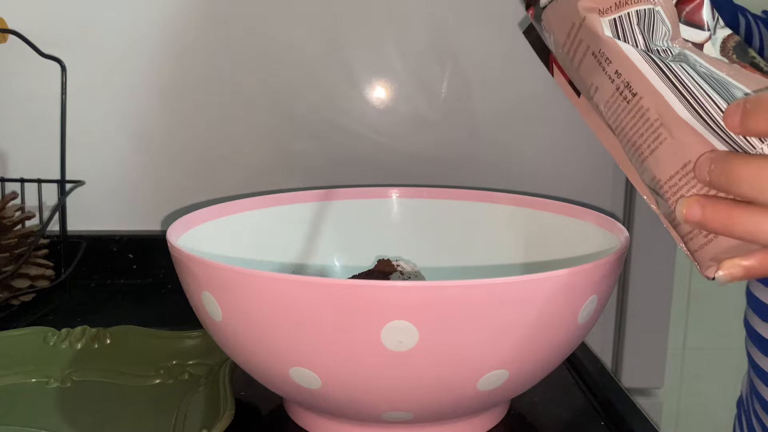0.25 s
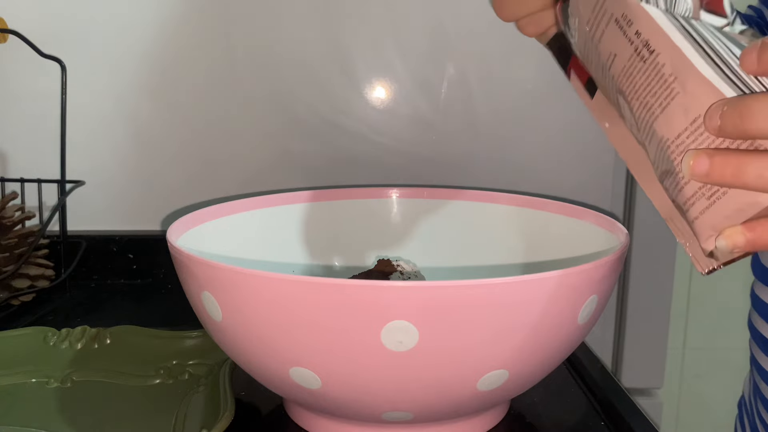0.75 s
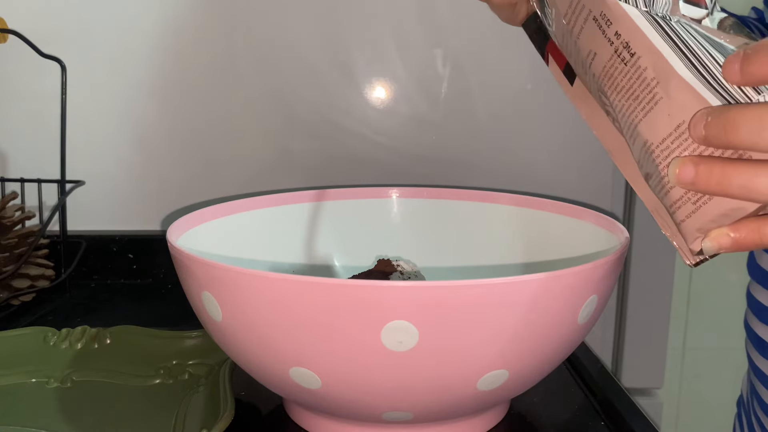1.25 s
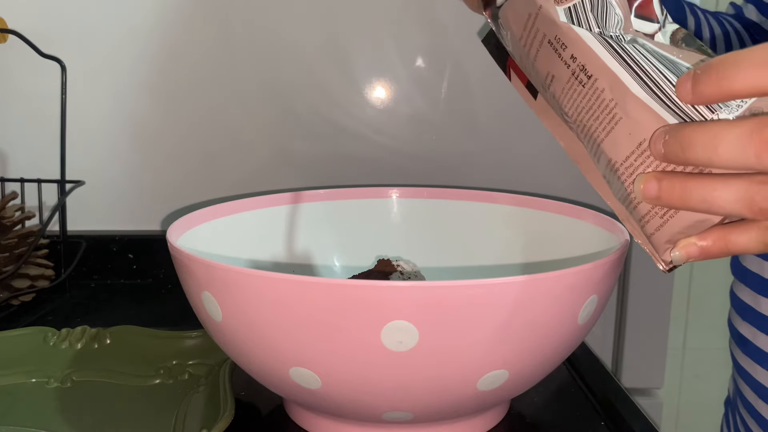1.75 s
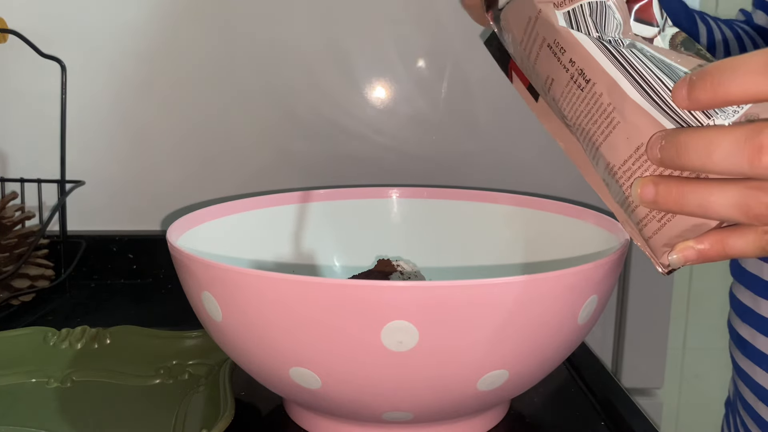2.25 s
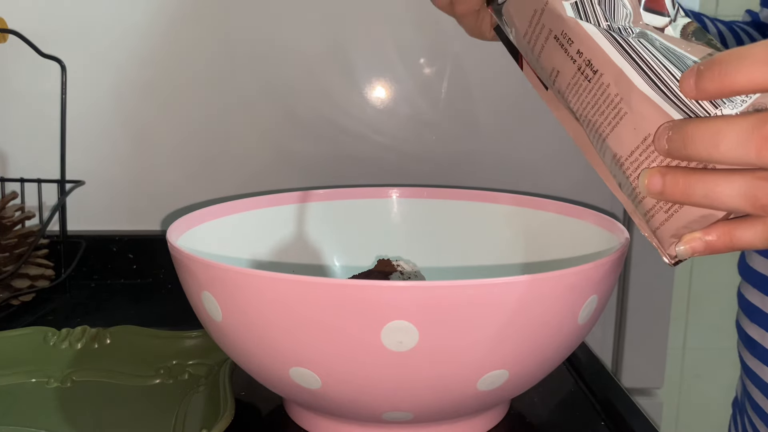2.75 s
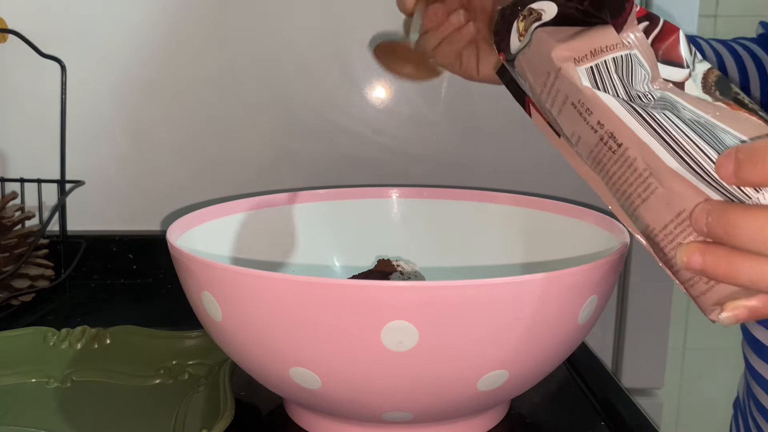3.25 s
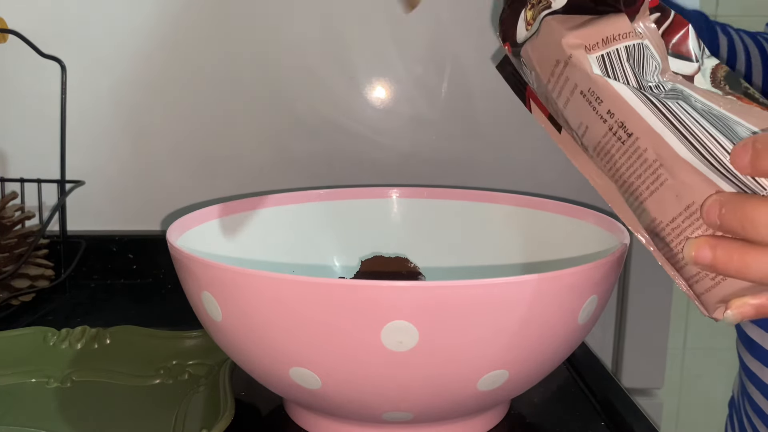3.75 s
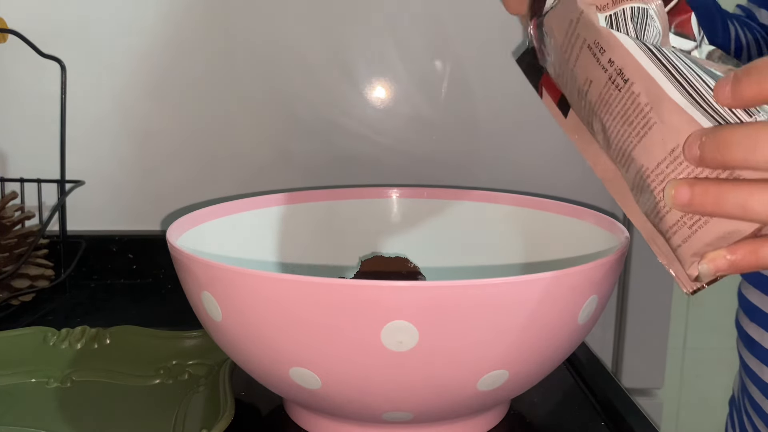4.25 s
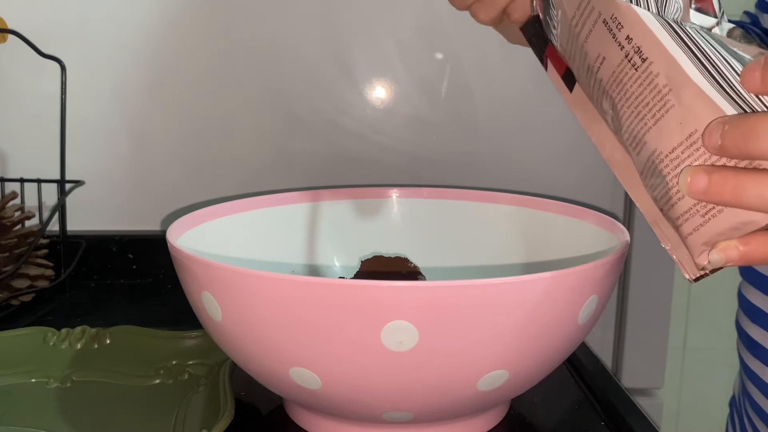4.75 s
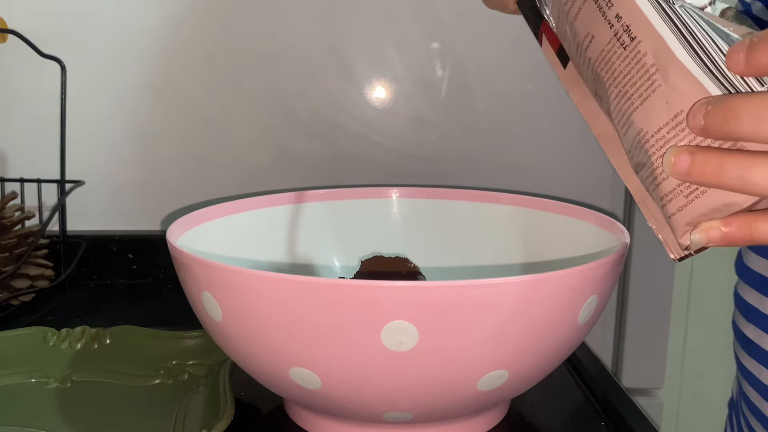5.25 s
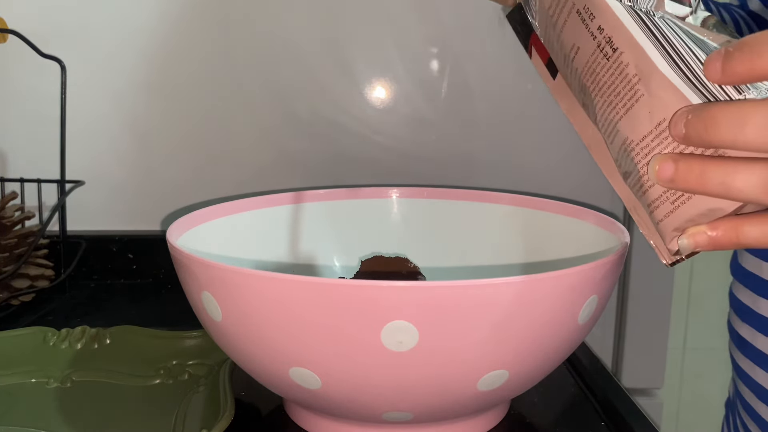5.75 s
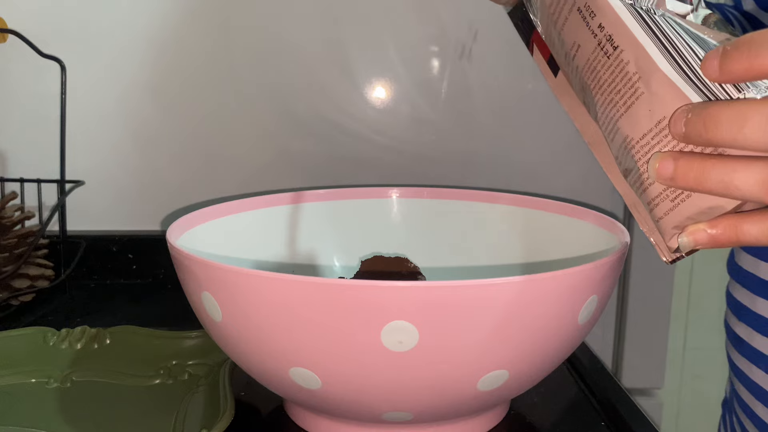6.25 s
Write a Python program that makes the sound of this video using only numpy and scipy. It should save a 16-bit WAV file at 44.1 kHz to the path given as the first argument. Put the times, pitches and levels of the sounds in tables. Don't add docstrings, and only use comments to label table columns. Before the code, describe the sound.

In a quiet kitchen, a spoon digs in a paper and foil packet close to a stereo microphone. Dry rustling and irregular crackles build to sharp snaps, then the packet rests while soft low thuds come through the worktop. A second dig brings louder cracks, lighter crinkling, a tiny pause and bright final snaps. A vehicle drones low outside at first, sinking in pitch and fading.

```python
import sys
import numpy as np
from scipy import signal
from scipy.fft import rfft, irfft, next_fast_len
from scipy.io import wavfile

SR = 44100
rng = np.random.default_rng(int(sys.argv[2]) if len(sys.argv) > 2 else 0)


def level_to_linear(level):
    exponent = np.asarray(level, float) / 20
    return 10 ** exponent


def materialize(psi):
    bounded = np.clip(np.atleast_2d(psi).T, -1, 1)
    quanta = np.round(bounded * 32767).astype(np.int16)
    wavfile.write(sys.argv[1], SR, quanta)


N = 285768
SIZE = next_fast_len(N + SR)
HZ = np.maximum(np.arange(SIZE // 2 + 1) * SR / SIZE, 1)

# frequency [Hz], density [dB per Hz].
AIR_COLOUR = [(120, -15), (190, -10), (310, -3.5), (430, -11), (700, -32), (1100, -19), (2100, -50.5),
              (4000, -42.5), (7000, -47), (9500, -40.5), (12000, -48), (13000, -58.5), (16000, -74.5)]
# frequency [Hz], level [dB].
FRIDGE_HUM = [(296, -65.5), (345, -72.5)]
# time [s], level [dB].
TYRE_WASH = [
    (0, -59),
    (1.5, -61),
    (3.0, -60.5),
    (3.3, -63),
    (3.6, -66.5),
    (4.0, -68),
    (6.48, -64.5),
]
# frequency [Hz], density [dB per Hz].
TYRE_COLOUR = [(250, 0), (500, 2.5), (1000, -4), (1800, -11.5), (2400, -18.5), (5000, -27), (9000, -45)]
# time [s], firing pitch [Hz], engine level [dB], road rumble level [dB].
VEHICLE = [(0, 50.9, -48, -47), (.25, 49.76, -46, -39), (.6, 48.58, -45.5, -43),
           (1.13, 45.62, -39.5, -36.5), (1.55, 42.64, -47.5, -44), (1.85, 40.95, -60, -48.5),
           (2.5, 41.03, -52.5, -49), (3.1, 40.3, -50, -46), (3.4, 40.3, -86.5, -46), (4.1, 40.1, -97, -51),
           (4.6, 40.6, -99, -60), (6.48, 41.5, -106, -60.5)]
# peak time [s], fall [s], strength [dB], wood ring over strength [dB].
WORKTOP_THUDS = [(.16, 0.067, -42.5, -18), (3.188, 0.13, -32.5, 0), (3.249, 0.19, -34.5, -16),
                 (3.649, 0.12, -38, -9.5), (3.748, 0.14, -43, -4), (3.859, 0.17, -39.5, -32.5),
                 (4.071, 0.076, -45.5, -1), (4.222, 0.063, -51, 9), (4.245, 0.13, -39, -9),
                 (4.79, 0.19, -46, -7.5), (.98, 0.052, -46, 1.5), (2.94, 0.21, -45.5, -17),
                 (5.63, 0.023, -52, -12.5)]
# frequency [Hz], width [Hz], level [dB].
WORKTOP_MODES = [(254, 34, -3.5), (316.8, 32, 5), (402, 50.5, 1.5), (440.6, 23.5, 3), (708, 68, -18),
                 (1150, 270, -28.5)]
# peak time [s], rise [s], fall [s], paper [dB], foil over paper [dB].
FIRST_SQUEEZES = [(0.137, 0.00506, 0.039, -42, -8.5), (.156, .01, 0.071, -53, -8),
                  (.195, 0.015, 0.13, -54.5, 4), (0.23, 0.067, .06, -54.5, 1),
                  (0.264, 0.097, 0.0136, -56.5, -6), (0.303, 0.0044, 0.084, -48, -12),
                  (0.337, 0.028, .11, -44.5, -5), (0.441, 0.0044, 0.014, -49.5, -22),
                  (.458, .003, 0.02, -42, -20), (0.475, 0.053, 0.036, -47, -6.5),
                  (0.629, 0.092, 0.14, -54.5, -8.5), (0.725, 0.14, 0.13, -45.5, -8),
                  (.79, 0.096, .04, -57, -8), (.92, 0.057, 0.055, -55, -14), (0.962, 0.6, 0.069, -59, -3.5),
                  (1.08, 0.029, 0.12, -75, 13.5), (1.185, 0.12, 0.18, -60, 7.5),
                  (1.334, 0.056, 0.1, -58.5, 8.5), (1.379, 0.017, 0.053, -48.5, -8),
                  (1.494, 0.14, 0.06, -58.5, -1.5), (1.572, 0.041, 0.13, -65.5, 5.5),
                  (1.647, 0.048, 0.096, -62, 6), (1.899, 0.058, 0.062, -59.5, 7),
                  (1.73, 0.1, 0.074, -60.5, 7), (1.813, .02, 0.12, -54, 0), (1.848, 0.094, 0.063, -58, 9.5),
                  (2.004, 0.0061, 0.15, -48, 0), (2.18, 0.017, 0.1, -50, 0),
                  (2.24, 0.024, 0.045, -51.5, -0.5), (2.333, 0.011, 0.12, -47, -3.5),
                  (2.378, 0.022, 0.19, -44.5, -15), (2.517, 0.088, 0.076, -45.5, -7.5),
                  (2.652, 0.11, 0.11, -58.5, -7), (2.777, 0.09, 0.16, -49, -5.5),
                  (2.971, 0.062, 0.05, -42.5, -6), (3.065, 0.035, 0.062, -67, -26)]
SECOND_SQUEEZES = [(4.031, 0.15, 0.027, -59, 5), (4.066, 0.006, 0.042, -44.5, -8),
                   (4.14, .07, 0.036, -67.5, 5), (4.222, 0.017, 0.12, -45, -13),
                   (4.352, 0.11, 0.15, -52, -8), (4.436, 0.078, 0.049, -52, -11),
                   (4.461, 0.032, 0.054, -38, -6.5), (4.55, 0.88, 0.354, -61.5, -5.5),
                   (4.752, 0.114, 0.017, -55.5, -2.5), (4.775, 0.03, 0.17, -51.5, -26),
                   (4.81, .016, 0.033, -55, 6.5), (4.935, 0.042, 0.18, -57, -2.5),
                   (5.011, 0.0066, 0.051, -55.5, -5), (5.114, 0.2, 0.18, -54.5, 1.5),
                   (5.27, 0.86, 0.17, -69, 0.5), (5.449, 0.12, 0.023, -70, 4.5),
                   (5.501, 0.037, 0.073, -63, 4), (5.547, 0.073, 0.015, -65.5, 3),
                   (5.619, 0.024, 0.081, -53.5, 4), (5.698, 0.065, 0.027, -56, 3),
                   (5.829, 0.038, 0.11, -57, 0), (5.901, 0.053, 0.093, -65.5, -2.5),
                   (5.97, 0.033, 0.29, -59, 4.5), (6.129, 0.019, 0.063, -48, 0.5),
                   (6.16, 0.04, 0.12, -49.5, -9), (6.218, 0.076, 0.019, -60.5, 6),
                   (6.294, 0.019, .07, -51, 0), (6.324, 0.033, 0.019, -48, -2),
                   (6.364, 0.073, 0.12, -47, -15), (6.469, 0.068, 0.24, -49.5, -3.5)]
# time [s], level over paper [dB].
BAG_FREEDOM = [
    (0, -11),
    (.5, -13.5),
    (.7, -3),
    (1.4, -5.5),
    (2.4, -16),
    (4.0, -8.5),
    (4.8, -4.5),
    (5.1, -16),
    (5.7, -9),
    (6.48, -21),
]
# from [s], to [s].
RESTS = [
    (3.081, 4.005),
    (5.345, 5.415),
]
# frequency [Hz], density [dB per Hz].
PAPER_COLOUR = [(500, -74.5), (900, 8), (1300, 0.5), (2000, 3.5), (2550, -6), (3300, 2), (4500, -8.5),
                (6000, -10.5), (9000, -18)]
FOIL_COLOUR = [(2500, -22), (4500, -5), (7000, -4.5), (8300, -1.5), (9500, 5), (12500, 0.5), (14000, -3.5),
               (15700, -13.5), (16000, -41)]
BAG_COLOUR = [(150, -5.5), (300, 17.5), (450, 7), (700, 17), (900, -9.5), (1300, -51.5)]
# frequency [Hz], level [dB], t60 [s].
PANEL_MODES = [(960, -4, .02), (1230, -3, .03), (1500, -4, .02), (1760, -4, .02), (1990, -5, .018),
               (3300, -9, .015), (3900, -10, .012)]
BODY_MODES = [(238, -11, 0.061), (364, -6, 0.053), (445, -4.5, 0.054), (545, -11, 0.035),
              (662, -2.5, 0.068), (735, -10, 0.022)]
# time [s], peak [dB],
# panel pitch [Hz], foil brightness [dB], body thump [dB].
FIRST_SNAPS = [(0.1348, -29.5, 1280, -30, -1), (0.3191, -25.5, 1630, -28, -7), (0.3375, -26, 1730, -6, -5),
               (0.457, -28, 3240, -15, -22), (0.6171, -41, 1460, -22, 4), (0.622, -42, 1210, -25, 13.5),
               (0.667, -32.5, 1050, -19.5, -5), (0.7056, -31, 2350, -15, -7), (0.7322, -31.5, 3350, -4, 0),
               (0.7125, -31.5, 1880, -15, -1), (0.7443, -28, 1400, -11, -4), (0.9745, -39.5, 900, -8, 9),
               (1.2717, -31.5, 1284, -32, 3.5), (1.271, -31, 1850, -38, -32),
               (1.3765, -33.5, 1820, 1.5, -20), (1.49, -39.5, 1220, -38.5, -4),
               (2.005, -52.5, 1150, 13.5, 8), (2.1788, -37.5, 1328, -3, -1.5),
               (2.2328, -36, 1230, -18.5, -10.5), (2.3554, -22, 1816, -1.5, -31),
               (2.3813, -18.5, 2140, 3.5, -31.5), (2.4325, -23, 1219, -9, -22.5),
               (2.484, -28, 3440, -2, -17), (2.5087, -18, 2040, -1, -19), (2.7744, -27.5, 1950, -2, -12.5),
               (2.8521, -31, 1845, -15.5, -12.5), (2.9684, -29.5, 1565, -6, -6)]
SECOND_SNAPS = [(4.0628, -33, 1720, -20, -4), (4.074, -35, 1840, -6.5, -7),
                (4.209, -21.5, 1900, -8.5, -11.5), (4.232, -14.5, 2080, -10.5, -12.5),
                (4.2334, -20, 3300, -19, -17), (4.3467, -23.5, 1940, -5.5, -11.5),
                (4.3645, -34, 1930, -26.5, -11), (4.449, -35, 1270, -24, -8),
                (4.4613, -25.5, 3460, -24, -6), (4.622, -50, 1800, -24, -4.5), (4.7414, -50, 1390, 8, -8),
                (4.7555, -15.5, 1690, -15.5, -11.5), (4.7678, -32, 1330, -6, 4.5),
                (4.783, -18, 1250, -40, -12), (4.809, -32.5, 1830, 0, -5), (4.823, -55, 1500, 8, -12),
                (4.9418, -45.5, 1720, -3, -3), (5.008, -41, 1780, 2.5, -3), (5.1112, -38, 3600, -21, -19),
                (5.6116, -44, 1010, -3, 7.5), (5.8253, -46.5, 1200, -5, -11),
                (5.965, -40.5, 1970, 8.5, -0.5), (6.1248, -43.5, 2040, 3, 0), (6.1521, -19.5, 2030, 2, -26),
                (6.2925, -55.5, 1480, 9, 10.5), (6.3193, -19, 2050, 5, -50), (6.3541, -12, 3300, 2, -23)]
FIRST_TICKS = [(0.154, -24, 1250, -4, -25), (0.184, -35, 1760, -10, -25), (0.2032, -26, 1840, -20, -25),
               (0.2445, -28, 1770, -19.5, -25), (0.302, -37, 1480, -12, -25), (0.355, -29, 1220, -14, -25),
               (0.4407, -26, 2260, -12, -25), (0.476, -37, 1270, 2, -25), (0.5915, -35, 1280, -17, -25),
               (0.7097, -21, 1850, -14, -25), (0.7748, -37.5, 1800, -8.5, -25),
               (0.7894, -37, 1670, -11.5, -25), (0.8949, -49, 1718, -13.5, -25),
               (0.9199, -40, 3570, -25, -25), (0.9326, -31, 1620, -18, -25), (0.941, -28, 1770, -5, -25),
               (1.0063, -37, 1950, -10, -25), (1.1802, -51, 1230, -10, -25), (1.3229, -37, 3350, -10, -25),
               (1.6307, -47, 1141, -10, -25), (1.7145, -54, 1670, -10, -25), (1.785, -45, 1938, -10, -25),
               (1.805, -34, 2010, -8, -25), (1.9474, -34.5, 1900, -24, -21), (2.2883, -49, 897, -24.5, -20),
               (2.632, -44, 1880, -10, -25), (2.7015, -46, 1910, -8, -25), (2.7482, -43, 1696, -8, -25),
               (2.8655, -30, 2040, -5, -25), (2.9213, -37, 1930, -15, -25), (2.95, -39, 1630, -12.5, -25),
               (3.039, -29, 1750, -39, -18), (3.0664, -46.5, 1693, -15, -28), (3.1461, -38, 1270, -30, -24)]
SECOND_TICKS = [(4.015, -59, 1000, -10, -25), (4.0292, -42, 1645, -10, -25),
                (4.2414, -40.5, 1500, -11, -25), (4.4287, -27, 3670, -20, -27),
                (4.4669, -12, 1340, -20, -30), (4.548, -50, 1810, -16, -25), (4.71, -39, 1750, -12, -21),
                (4.7943, -19.5, 1180, -28, -21), (4.8928, -41, 1840, -3, -25), (4.9207, -37, 977, -14, -22),
                (4.9791, -40, 1330, -9, -25), (5.0719, -38, 1700, -27, -27), (5.128, -32, 1180, -10, -25),
                (5.1494, -43, 1248, -10, -23), (5.311, -41, 1150, -22, -26.5),
                (5.4879, -52, 1030, -10, -30), (5.53, -43, 1030, -15, -25), (5.6734, -50, 4100, -17, -25),
                (5.6806, -38, 4030, -10, -25), (5.7533, -41, 1740, -8, -25), (5.9069, -43, 1300, -10, -25),
                (6.2877, -42, 1830, -7.5, -25), (6.4644, -40, 2020, -14, -27)]
# frequency [Hz], lead of the left channel [radians].
CHANNEL_PHASE = [(0, 0), (340, -.7), (800, 2.3), (1750, -.6), (2900, 1.5), (4100, 0.1), (5400, 2.2), (7200, 0),
                 (8600, -2.85), (9400, -3.4), (11000, -6.28), (12750, -9.2), (14000, -9.7), (14800, -12.56)]
# frequency [Hz], share [0 to 1].
CHANNEL_SPREAD = [(60, .04), (250, .3), (600, .85), (1500, .6), (5500, .8), (7000, .12), (9000, .01),
                  (16000, .01)]
# frequency [Hz], left minus right [dB].
CHANNEL_BALANCE = [(60, -3.5), (110, 0), (200, -3.5), (380, -1), (700, 0), (1290, 0), (2380, 1.5), (4400, 1.5),
                   (8120, 4.5), (15000, -1.5)]


def rms_one(x):
    return x / np.sqrt(np.mean(x ** 2) + 1e-20)


def peak_one(rows):
    return rows / np.abs(rows).max(axis=1, keepdims=True)


def in_time(rows):
    s, *columns = np.transpose(rows)
    return [np.interp(np.arange(N) / SR, s, column) for column in columns]


def at_hz(points):
    hz, value = np.transpose(points)
    return np.interp(np.log(HZ), np.log(hz), value)


def shape(points):
    return rms_one(level_to_linear(at_hz(points)))


def band(x, low_hz, high_hz):
    return signal.sosfilt(signal.butter(2, [low_hz, high_hz], "band", fs=SR, output="sos"), x)


def drift(rate_hz):
    r = np.exp(-2 * np.pi * rate_hz / SR)
    slow = signal.lfilter([1], [1, -2 * r, r * r], rng.standard_normal(N + SR))
    return rms_one(slow[SR:])


def ring(clicks, hz, t60):
    r, w = level_to_linear(-60 / (t60 * SR)), 2 * np.pi * hz / SR
    return signal.lfilter([0, np.sin(w)], [1, -2 * r * np.cos(w), r * r], clicks + 1e-18)


def swell(peak_s, rise_s, fall_s, level_db, steepness):
    t = np.arange(0, N + 32, 32) / SR - np.asarray(peak_s)[:, None]
    rising = -t / np.reshape(rise_s, (-1, 1))
    falling = t / np.reshape(fall_s, (-1, 1))
    ramp = np.clip(1 - np.maximum(rising, falling), 0, 1)
    power = np.sum((level_to_linear(level_db)[:, None] * ramp ** steepness) ** 2, axis=0)
    return np.interp(np.arange(N) / 32, np.arange(len(power)), np.sqrt(power))


def kitchen():
    white = rng.standard_normal((3, 4, N))
    air = level_to_linear(-64.5) * shape(AIR_COLOUR) * rfft(white[0], SIZE)
    wash = shape(TYRE_COLOUR) * rfft(white[1] * level_to_linear(in_time(TYRE_WASH)[0]), SIZE)
    hum = sum(level_to_linear(db) * rms_one(band(white[2], hz - 3, hz + 3)) for hz, db in FRIDGE_HUM)
    return air + wash + rfft(hum, SIZE)


def engine_drone():
    pitch, drone_db, _ = in_time(VEHICLE)
    level = np.sqrt(2) * level_to_linear(drone_db + drift(8.9))
    return level * np.sin(2 * np.pi * np.cumsum(pitch) / SR)


def rumble_and_thuds():
    _, drone_db, deep_db = in_time(VEHICLE)
    s, fall, thud_db, wood_db = np.transpose(WORKTOP_THUDS)
    rise = 0.058
    white = rng.standard_normal((3, 4, N))

    road_power = level_to_linear(deep_db) ** 2 - 2 * level_to_linear(drone_db) ** 2
    road = np.sqrt(np.maximum(road_power, level_to_linear(deep_db - 14) ** 2))
    heavy_db = thud_db.max() + 6 * (thud_db - thud_db.max()) - 1
    deep = np.hypot(road, swell(s, rise, 1.4 * fall, heavy_db, 1.12))

    building = level_to_linear(-56.5 + 0.1 * (deep_db + 52) - 0.8 * drift(4.1))
    upper = np.hypot(building, swell(s, rise, fall, thud_db, 1.47))

    low = deep * rms_one(band(band(white[0], 27.0, 75), 42, 140))
    low += upper * rms_one(band(band(white[1], 69.3, 130.2), 31, 160))
    wood = sum(level_to_linear(db) * band(white[2], hz - width / 2, hz + width / 2) for hz, width, db in WORKTOP_MODES)
    return low + swell(s, 0.58 * rise, fall, thud_db + wood_db, 1.93) * rms_one(wood)


def grains(per_s, spread_db):
    sizes = level_to_linear(spread_db * np.minimum(rng.exponential(1, N), 4)) * rng.choice([-1, 1], N)
    return rms_one(sizes * (rng.random(N) < per_s / SR))


def crinkles(per_s, spread_db, cycles):
    clicks, dealt = grains(per_s, spread_db), rng.integers(0, 16, N)
    facet_gain = level_to_linear(3 * rng.standard_normal((16, N // 2048 + 1)))
    clicks = clicks * facet_gain[dealt, np.arange(N) // 2048]
    pitches = np.geomspace(640, 5200, 16)
    return rms_one(sum(ring(clicks * (dealt == k), hz, cycles / hz) * hz for k, hz in enumerate(pitches)))


def panel_rustle(moving):
    out = 0
    for hz, db, t60 in PANEL_MODES:
        width = 3.5 / t60
        peak = 1 / (1 + 1j * (HZ ** 2 - hz ** 2) / (HZ * width))
        turns = level_to_linear(6 * drift(7))
        out = out + level_to_linear(db) * peak * np.sqrt(SR / width / 20) * rfft(moving * turns, SIZE)
    return level_to_linear(-13) * out


def squeeze_levels():
    s, rise, fall, paper_db, foil_db = np.transpose(FIRST_SQUEEZES + SECOND_SQUEEZES)
    t = np.arange(N) / SR
    touching = 1
    for start, end in RESTS:
        outside = np.maximum(start - t, t - end)
        touching = touching * np.clip(outside / 0.029 + .5, 0, 1)
    touching = touching * np.where(t < .2, t > .131, 1)
    levels = paper_db, paper_db + foil_db, paper_db + np.interp(s, *np.transpose(BAG_FREEDOM))
    steepness = 2.3, 2.53, 1.68
    resting_db = -71.5, -80, -84.5
    return [np.hypot(swell(s, rise, fall, db, steep), level_to_linear(rest_db)) * touching
            for db, steep, rest_db in zip(levels, steepness, resting_db)]


def rustle():
    near = level_to_linear(-2) * grains(12000, spread_db=1.5) + level_to_linear(-4) * crinkles(1800, spread_db=2.2, cycles=30)
    sound = np.vstack([near, level_to_linear(3.5) * rng.standard_normal((4, N))])
    sound *= level_to_linear(2.0 * drift(40) + 1.2 * drift(150))
    levels = squeeze_levels()
    out = panel_rustle(levels[0] * sound)
    materials = zip(levels, (PAPER_COLOUR, FOIL_COLOUR, BAG_COLOUR), (-7, -1.5, -5), (2500, 8800, 500))
    for level, colour, db, split_hz in materials:
        low = 1 / (1 + (HZ / split_hz) ** 8)
        lean = level_to_linear(2.0 * drift(9))
        low_part = low * rfft(level * lean * sound, SIZE)
        high_part = (1 - low) * rfft(level / lean * sound, SIZE)
        out = out + level_to_linear(db) * shape(colour) * (low_part + high_part)
    return out


def crease_cracks(peak_db, pitch, bright_db, paper_db, small):
    t = np.arange(900) / SR / .0003
    tear = 0.45 * rng.standard_normal((len(pitch), 900)) * t * np.exp(1 - t)
    tear[:, 8] += np.clip((peak_db + 45) / 20, .2, 1)
    notes = [ring(burst, hz, 10 / hz) for burst, hz in zip(tear, pitch)]
    note = peak_one(band(notes, 700, 6000))

    edges = (1000, 2400), (2700, 4600), (4600, 8400), (9300, 12800), (13600, 16500)
    torn = [peak_one(band(band(tear, *hz), 900, 17000)) for hz in edges]
    dull, sharp, bright, top, topmost = [part * (-1) ** k for k, part in enumerate(torn)]

    sharp_db = np.where(small, 0, 1.5 + bright_db)
    parts = [(dull, paper_db - 8), (note, 0.5 + 0 * pitch), (sharp, sharp_db - 8),
             (bright, 0.87 * bright_db + 0.5),
             (top, bright_db - 6), (topmost, bright_db - 19.5)]
    return sum(level_to_linear(peak_db + db)[:, None] * part for part, db in parts)


def struck_modes(at, modes, edges, level_db):
    strength = rng.normal(0, 4.5, (len(at), len(modes)))
    out = np.zeros(N + 900)
    for k, (hz, db, t60) in enumerate(modes):
        clicks = np.zeros(N + 900)
        clicks[at + 20] = level_to_linear(level_db + db + strength[:, k])
        out += band(ring(clicks, hz, t60), *edges)
    return out


def snaps():
    big = FIRST_SNAPS + SECOND_SNAPS
    s, peak_db, pitch, bright_db, thump_db = np.transpose(big + FIRST_TICKS + SECOND_TICKS)
    peak_db = peak_db - 11.5 * (np.arange(len(s)) >= len(big))
    small = pitch > 2600
    paper_db = -7.5 * small
    at = np.round(s * SR).astype(int) - 8
    out = np.zeros(N + 900)
    for i, crack in zip(at, crease_cracks(peak_db, pitch, bright_db, paper_db, small)):
        out[i:i + 900] += crack
    out += struck_modes(at, PANEL_MODES, (700, 6000), peak_db + paper_db - 17)
    out += struck_modes(at, BODY_MODES, (150, 1100), peak_db + thump_db - 9.5)
    return out[:N]


def crack_dip():
    return 1 - 0.68 / (1 + (2 * (HZ - 2573) / 270) ** 2)


def echoes(x):
    t = np.arange(SR // 2) / SR
    decay = level_to_linear(-26 - 60 * t / .025) + level_to_linear(-40 - 60 * t / .16)
    tails = rng.standard_normal((4, len(t))) * decay * np.clip(t / .0006, 0, 1)
    return rfft(x, SIZE) * rfft(tails, SIZE) / np.sqrt(1 + (HZ / 9000) ** 2)


def stereo_image(direct, diffuse):
    turn = np.exp(.5j * np.interp(HZ, *np.transpose(CHANNEL_PHASE)) * [[1], [-1]])
    near, far, left, right = diffuse
    unlike = at_hz(CHANNEL_SPREAD)
    alike = np.sqrt(.62) * near * turn + np.sqrt(.38) * far / turn
    both = direct * turn + np.sqrt(1 - unlike) * alike + np.sqrt(unlike) * np.array([left, right])
    balance = level_to_linear(at_hz(CHANNEL_BALANCE) / 2 * [[1], [-1]])
    return irfft(both * balance, SIZE)[:, :N]


def scene():
    room, drone, rumble = kitchen(), engine_drone(), rumble_and_thuds()
    hiss, cracks = rustle(), snaps()
    direct = crack_dip() * rfft(cracks, SIZE) + rfft(drone, SIZE) + hiss[0]
    diffuse = crack_dip() * echoes(cracks) + hiss[1:] + rfft(rumble, SIZE) + room
    return stereo_image(direct, diffuse)


def roll_off(x):
    return signal.sosfilt(signal.butter(12, 16980, fs=SR, output="sos"), x)


def record(dry):
    mix = signal.sosfilt(signal.cheby2(10, 60, 17200, fs=SR, output="sos"), dry)
    return roll_off(mix)


dry = scene()
out = record(dry)
materialize(out)
```